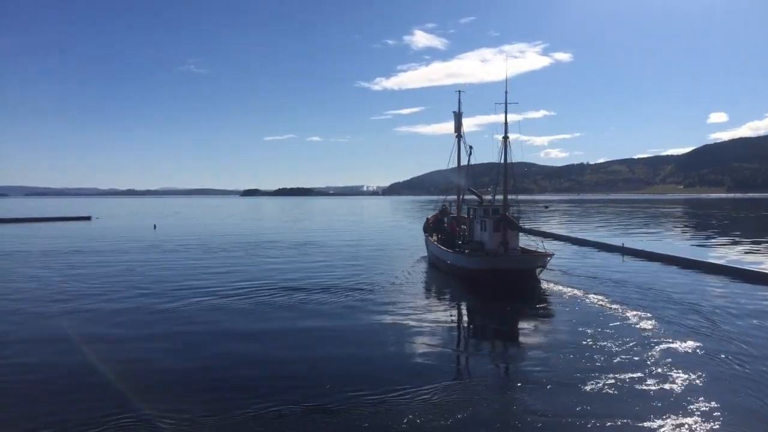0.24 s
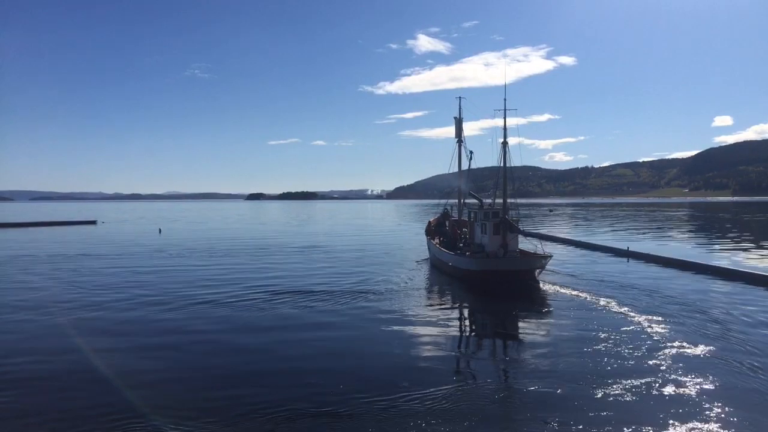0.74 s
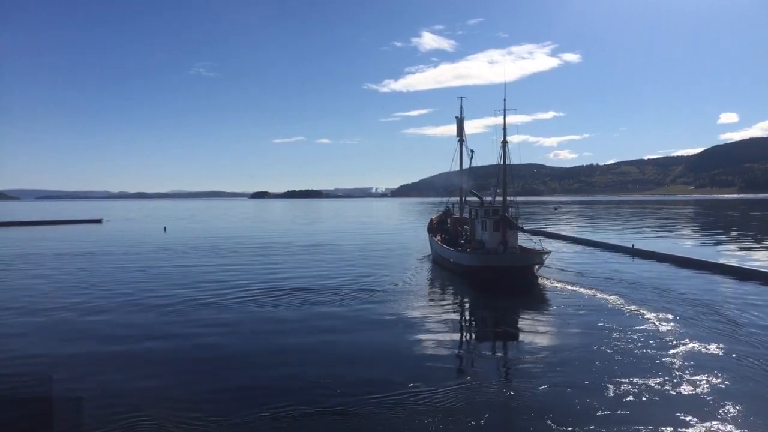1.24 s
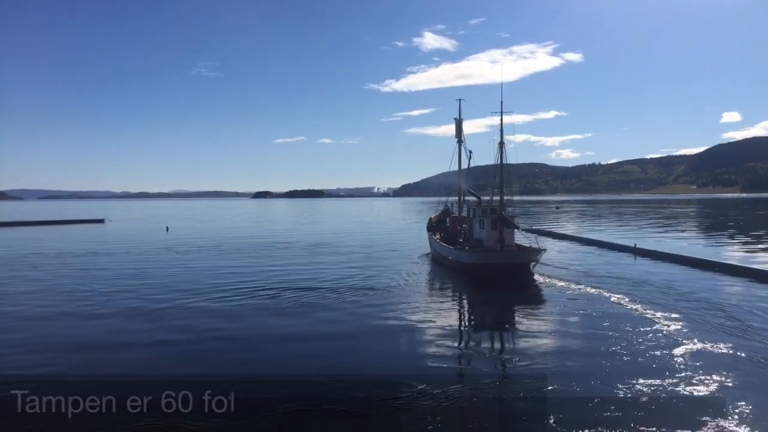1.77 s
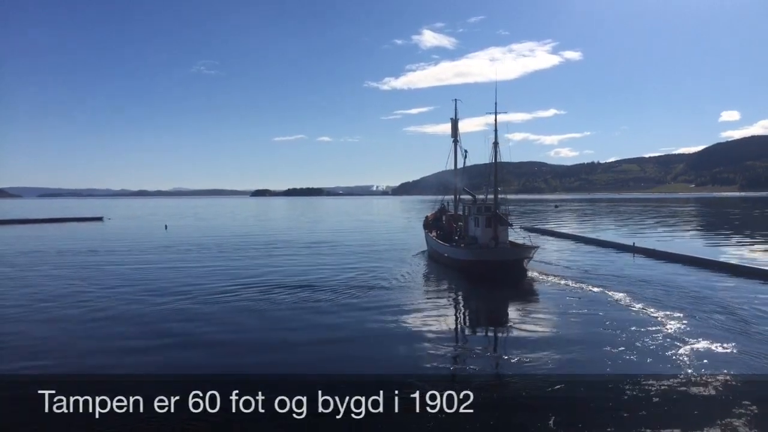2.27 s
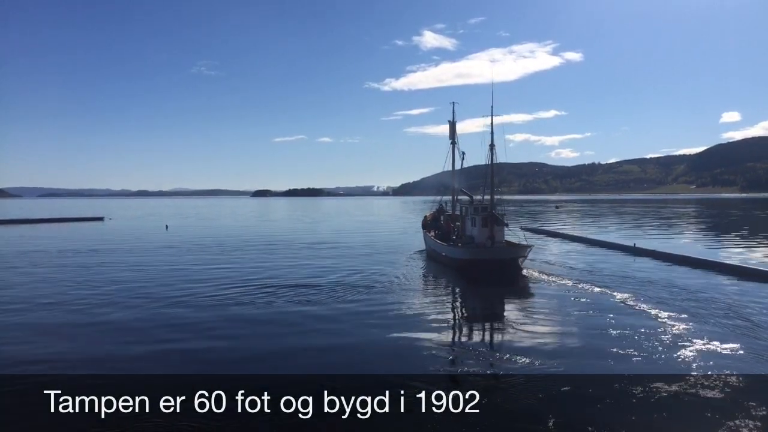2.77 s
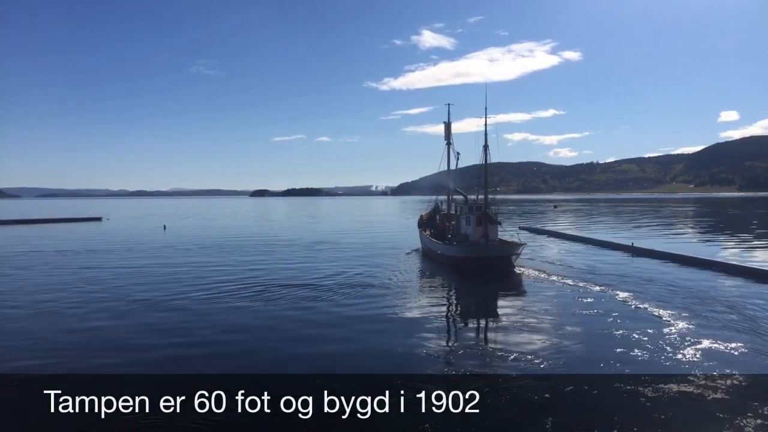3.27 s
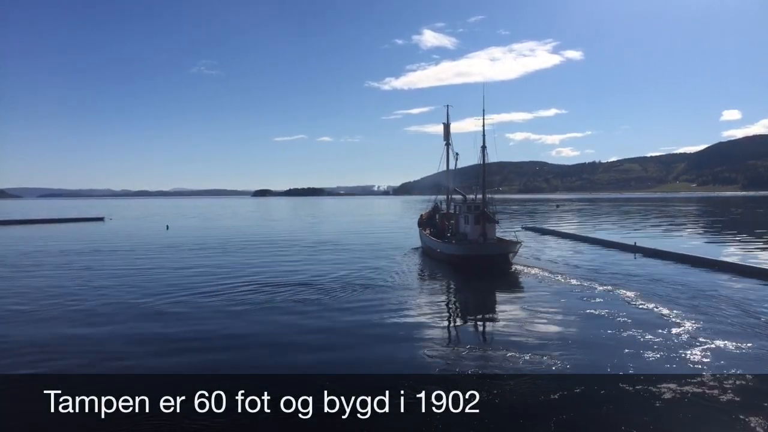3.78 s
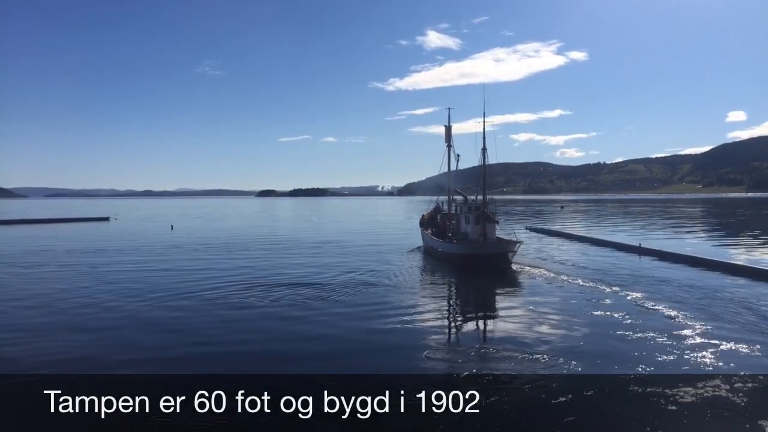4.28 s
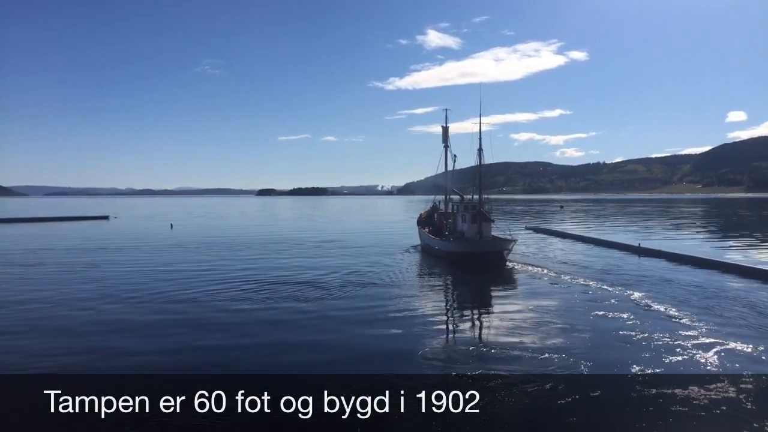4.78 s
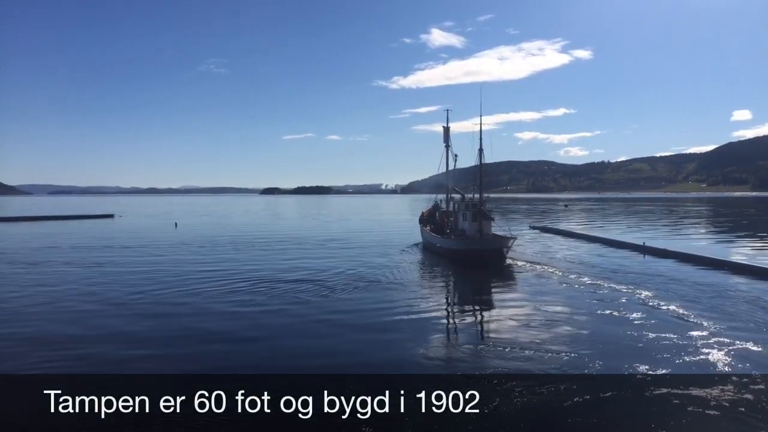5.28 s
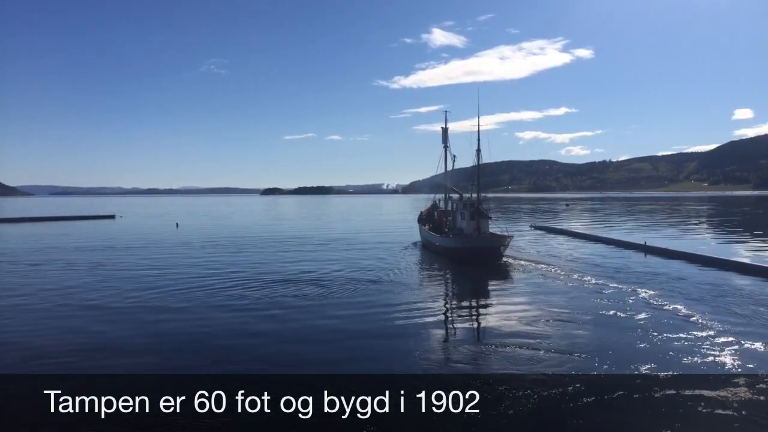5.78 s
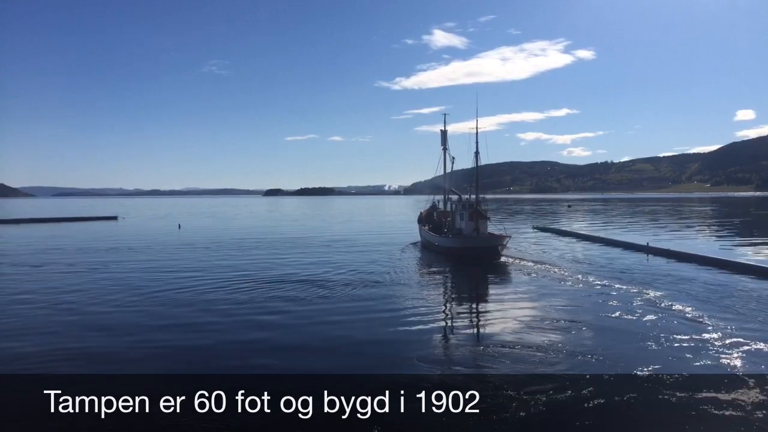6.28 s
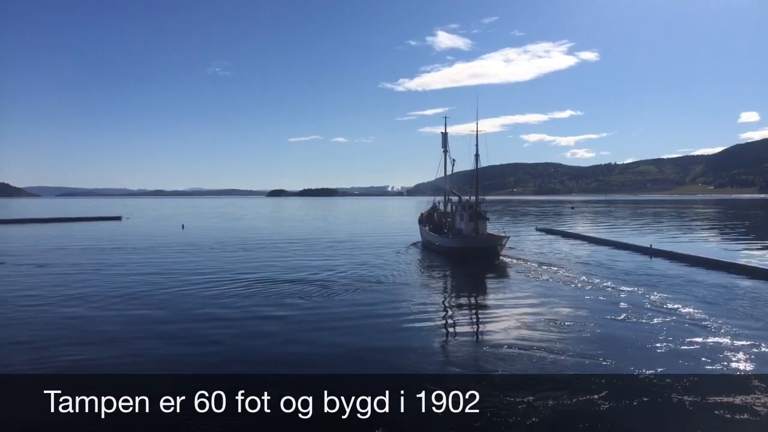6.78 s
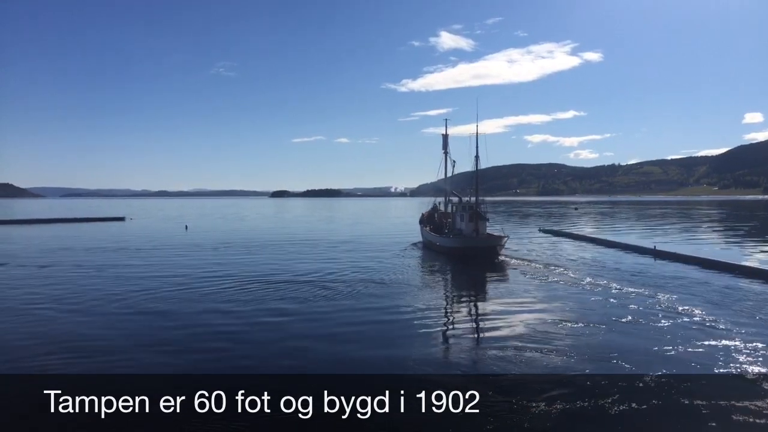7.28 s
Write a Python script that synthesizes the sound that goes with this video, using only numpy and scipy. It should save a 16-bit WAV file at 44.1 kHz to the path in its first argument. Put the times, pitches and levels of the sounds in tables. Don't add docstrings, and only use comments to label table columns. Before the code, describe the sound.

A slow two-cylinder oil engine knocks hollow tonk-tonk about six times a second as a wooden boat draws away over softly hissing water.

```python
import sys
import numpy as np
from scipy import signal
from scipy.io import wavfile
from scipy.ndimage import uniform_filter1d

SR = 44100
rng = np.random.default_rng(int(sys.argv[2]) if len(sys.argv) > 2 else 0)


def dump(signal):
    limited = np.clip(np.atleast_2d(signal).T, -1, 1)
    pcm = np.round(limited * 32767).astype(np.int16)
    wavfile.write(sys.argv[1], SR, pcm)


def boost_factor(decibels):
    exponent = np.asarray(decibels, float) / 20
    return 10 ** exponent


N = 332073
T = np.arange(N) / SR

# time in seconds, firings counted so far.
CRANK = [(-0.3176, -3), (0.159, 0), (0.7933, 4), (1.426, 8), (2.0572, 12), (2.6867, 16), (3.3147, 20),
         (3.941, 24), (4.5657, 28), (5.189, 32), (5.811, 36), (6.4317, 40), (7.0515, 44), (7.6703, 48)]
# time in seconds, level in dB.
CHURN = [(0, -49), (0.9, -51.5), (1.65, -52.5), (2.01, -57.5), (2.3, -56), (2.81, -52), (3.0, -53.5),
         (3.33, -52), (4.09, -51.5), (4.78, -53), (5.14, -56.5), (5.75, -55.5), (6.19, -52), (7.0, -57.5),
         (7.53, -54)]
# time in seconds, low throat in Hz, middle throat in Hz.
THROATS = [(0, 615, 1360), (1.6, 655, 1300), (3.4, 661, 1395), (4.8, 745, 1532), (5.2, 743, 1300),
           (7.53, 778, 1272)]


def rms_one(x):
    return x / np.sqrt(np.mean(x ** 2) + 1e-20)


def in_time(rows):
    s, *columns = np.transpose(rows)
    return [np.interp(T, s, c) for c in columns]


def at(rows, s, column):
    return np.interp(s, [row[0] for row in rows], [row[column] for row in rows])


def drift(rate, size=N):
    r = np.exp(-80 * np.pi * rate / SR)
    white = rng.standard_normal(size // 40 + 2002)
    slow = signal.lfilter([1], [1, -2 * r, r * r], white)[2000:]
    return np.interp(np.arange(size) / 40, np.arange(len(slow)), slow / slow.std())


def resonate(x, hz, width_hz):
    r = np.exp(-np.pi * width_hz / SR)
    feedback = [1, -2 * r * np.cos(2 * np.pi * hz / SR), r * r]
    return signal.lfilter([(1 - r * r) / 2, 0, (r * r - 1) / 2], feedback, x)


def band(x, low_hz, high_hz, order=2):
    return signal.sosfilt(signal.butter(order, [low_hz, high_hz], "band", fs=SR, output="sos"), x)


def throat(gas, hz, width_hz):
    tone = rms_one(resonate(resonate(gas, hz, width_hz), hz, width_hz))
    recent_power = uniform_filter1d(tone ** 2, size=round(SR / width_hz))
    return rms_one(tone / np.sqrt(.15 + recent_power))


def swell(t, rise, t60, tail_db, tail_t60):
    fall = boost_factor(-60 * t / t60) + boost_factor(tail_db - 60 * t / tail_t60)
    return (1 - np.exp(-(t / rise) ** 2)) * fall


def add(out, x, s):
    i = round(s * SR)
    x = x[max(-i, 0):N - i]
    out[max(i, 0):max(i, 0) + len(x)] += x


def taps(rows, cycles, width):
    out, t = np.zeros(N), T[:int(.03 * SR)]
    for s, peak_db, hz in rows:
        noise = band(rng.standard_normal(len(t)), 0.8 * hz, 1.22 * hz)
        burst = rms_one(resonate(noise, hz, width * hz)) * swell(t, 0.002, cycles / hz, -31, .03)
        add(out, boost_factor(peak_db + 4) * burst, s)
    return out


def roll(s):
    return np.cos(2 * np.pi * (s - .3) / 2.16)


def firings():
    # start in seconds, tonk level in dB,
    # middle throat level in dB, upper throat level in dB, upper throat pitch in Hz.
    fore = [(0.112, -13.5, -12, -25, 1575), (0.433, -16, -8.5, -22, 1490), (0.748, -15, -19, -24, 1700),
            (1.064, -12.5, -13.5, -26, 1606), (1.382, -13, -19, -21.5, 1510),
            (1.6984, -18.5, -15, -21.5, 1670), (2.013, -12, -19, -23.5, 1680),
            (2.329, -16.5, -24, -22, 1710), (2.6449, -15.5, -22, -22.5, 1800),
            (2.96, -15, -15.5, -23, 1950), (3.269, -12, -15, -24, 1720), (3.581, -18.5, -20, -27, 1850),
            (3.897, -18, -12.5, -24, 1620), (4.2092, -15, -14.5, -24, 1947), (4.519, -18.5, -12, -23, 1926),
            (4.8324, -15, -14.5, -21.5, 1490), (5.143, -17.5, -10, -25, 1960),
            (5.4576, -19, -22, -21, 1550), (5.77, -19, -31, -19, 1440), (6.0783, -25.5, -20, -23.5, 1890),
            (6.39, -19, -19, -20, 1570), (6.697, -18, -12.5, -30, 1686), (7.0059, -13, -18, -20, 1665),
            (7.3166, -13.5, -37, -19.5, 1702)]
    aft = [(0.2746, -16, -5, -30, 1510), (0.5887, -11, -13.5, -29, 1490), (0.9065, -16.5, -18.5, -26, 1940),
           (1.223, -13.5, -6.5, -28.5, 1570), (1.5377, -12.5, -11, -25, 1570),
           (1.855, -12.5, -16, -23.5, 1540), (2.1671, -16.5, -25, -23.5, 1760),
           (2.485, -9.5, -19.5, -21.5, 1680), (2.8, -13.5, -14, -27, 1660),
           (3.1114, -16, -14.5, -26.5, 1680), (3.427, -18.5, -12, -28.5, 1468), (3.74, -14, -13, -26, 1460),
           (4.053, -13.5, -14.5, -27.5, 1500), (4.3633, -13.5, -18, -26.5, 1950),
           (4.6741, -14, -19, -25.5, 1400), (4.9871, -12.5, -14, -28, 1510), (5.3, -14, -14, -21.5, 1940),
           (5.611, -18, -21.5, -24, 1960), (5.9246, -11.5, -24, -22.5, 1530),
           (6.233, -13, -21, -23.5, 1563), (6.544, -22, -20, -29, 1690), (6.853, -18, -17.5, -28.5, 1740),
           (7.1586, -19.5, -39, -28, 1740), (7.471, -16, -18, -32, 1730)]
    earlier = (-0.76, 11, -53, -26, 1504)
    return [earlier] + [row for pair in zip(fore, aft) for row in pair]


def rumble():
    return boost_factor(-72) * rms_one(band(rng.standard_normal(N), 18, 38))


def drone():
    # multiple of the firing rate, level near in dB, level far away in dB.
    overtones = [(7, -54, -55), (8, -66, -66), (10, -63, -65), (11, -58, -58), (12, -40, -47),
                 (13, -60, -62), (14, -60, -60), (16, -58, -57), (17, -60, -53), (18, -39.5, -36.5),
                 (19, -55, -51), (20, -52, -52), (23, -59, -53), (24, -48, -41.5), (25, -54, -52),
                 (29, -48, -58), (30, -43, -54), (31, -53, -60), (35, -51, -55), (36, -43, -54),
                 (37, -49, -59)]
    turns = in_time(CRANK)[0]
    away = T / T[-1]
    out = 0
    for multiple, near_db, far_db in overtones:
        level_db = near_db + (far_db - near_db) * away + .04 * multiple * drift(2.5)
        lag = .0005 * multiple ** 2 * drift(2.2)
        out = out + np.sqrt(2) * boost_factor(level_db) * np.cos(2 * np.pi * multiple * turns + lag)
    return out


def wash():
    # pitch in Hz, level in dB per Hz.
    colour = [(140, 0), (313, -1.5), (390, -9), (690, -3), (924, -12.5), (1280, -8.5), (2010, -14),
              (2320, -28)]
    swelling = in_time(CHURN)[0]
    white = rng.standard_normal((2, N))
    hz, db = np.transpose(colour)
    out, edges = 0, 128 * 2 ** np.arange(0, 4.9, 1 / 4)
    for k, (low, high) in enumerate(zip(edges, edges[1:])):
        middle = np.log(low * high) / 2
        gain_db = np.interp(middle, np.log(hz), db) + 2.3 * drift(17.0)
        out = out + boost_factor(gain_db) * band(white[k % 2], low, high)
    return boost_factor(-34 + .5 * (swelling - swelling.mean())) * rms_one(out)


def bubbly(per_s, grain_db):
    size = boost_factor(4.3 * np.minimum(rng.exponential(1, N), 5))
    grains = size * rng.choice([-1, 1], N) * (rng.random(N) < per_s / SR)
    return rng.standard_normal(N) + boost_factor(grain_db) * rms_one(grains)


def spray():
    # pitch in Hz, width in Hz, level in dB at mean churn,
    # share of the churn's swing (a plain factor).
    bright = [(4450, 1510, -53.5, 1.06), (7750, 2500, -60, 0.99), (11700, 6000, -67, 0.88)]
    out = boost_factor(-65) * rms_one(band(rng.standard_normal(N), 2400, 15000, order=1))
    together = drift(32)
    swing_db = in_time(CHURN)[0] + 54
    for hz, width, db, share in bright:
        flicker_db = .8 * together + 1.4 * drift(45)
        water = band(bubbly(900, -3.7), hz - 0.64 * width, hz + 0.34 * width)
        out += boost_factor(db + share * swing_db + flicker_db) * rms_one(resonate(water, hz, width))
    return out


def splashes():
    # start in seconds, length in seconds, pitch in Hz, level in dB.
    wavelets = [
        (4.1, 0.08, 7700, -55),
        (5.596, 0.14, 7800, -56),
        (5.64, 0.114, 11400, -81),
        (0, 0.068, 295.4, -26.5),
        (.6, 0.28, 238, -35),
        (2.0, 0.19, 190, -36.5),
        (2.24, 0.098, 176.5, -29.5),
        (2.42, 0.066, 172, -35),
        (6.75, 0.1, 199.2, -37),
    ]
    out, longest = np.zeros(N), int(.3 * SR)
    for s, length, hz, db in wavelets:
        spread = .09 if hz > 1000 else .01
        t = T[:int(length * SR)]
        fizz = rng.standard_normal(longest)[:len(t)] * boost_factor(5 * drift(120, size=longest))[:len(t)]
        fizz = rms_one(band(fizz, (1 - spread) * hz, (1 + spread) * hz))
        add(out, boost_factor(db) * fizz * np.sin(np.pi * t / length), s)
    return out


def drips():
    when, size, pitch = rng.random((60, 3)).T
    s = when ** 1.5 * T[-1]
    peak_db = -42 - 1.2 * s + 3 * (2 * size - 1)
    return taps(zip(s, peak_db, 6000 * 2 ** pitch), 40.0, 0.3)


def thumps():
    fade_db_per_s = .5
    rim_hz, rim_width_hz, rim_db = 2950, 150, -3.5
    out, t = np.zeros(N), T[:int(.1 * SR)]
    for k, (s, *_) in enumerate(firings()):
        gas = rng.standard_normal((3, len(t)))
        blow = rms_one(band(gas[0], 220, 463)) + boost_factor(-9.5) * rms_one(band(gas[1], 810, 1320))
        blow += boost_factor(-11 + 2.5 * s) * throat(gas[1], 539, 65)
        add(out, boost_factor(-26.5 - fade_db_per_s * s) * blow * swell(t, 0.0035, 0.07, -40, .1), s - .004)
        edge = rms_one(band(gas[2] ** 3, 1900, 3400))
        edge += boost_factor(rim_db) * rms_one(resonate(gas[2], rim_hz, rim_width_hz))
        crack_db = -33.5 - 12.0 * (1 - k % 2) - fade_db_per_s * s
        add(out, boost_factor(crack_db) * edge * swell(t, .002, 0.028, -40, .1), s + 0.0049)
    return out


def tonks():
    aft_lift_hz, lift_hz_per_db = 25, 3.5
    upper_near_db, upper_far_db, swing_s = -45, -31, 3
    tonk, gusts, t = np.zeros(N), np.zeros((3, N)), T[:int(.3 * SR)]
    for k, (s, peak_db, *_) in enumerate(firings()):
        stronger_db = peak_db + 15
        hz = at(THROATS, s, column=1) + aft_lift_hz * (1 - k % 2) + lift_hz_per_db * stronger_db
        boom_db = -26.5 - 0.87 * s + 0.2 * stronger_db + 2.5 * roll(s)
        upper_db = upper_near_db + (upper_far_db - upper_near_db) * min(s / swing_s, 1)
        gas = rng.standard_normal((3, len(t))) * boost_factor(1.8 * drift(46.0, size=len(t)))
        main = band(throat(gas[0], hz, 107.0), 543, 867)
        leak = band(throat(gas[1], 645, 119.0), 548, 840)
        lumps = boost_factor(3.7 * np.cos(2 * np.pi * (t - .009) / 0.0238))
        add(tonk, boost_factor(peak_db - 6.5) * main * lumps * swell(t, 0.0056, 0.077, -7, 0.21), s - .005)
        leak_db = peak_db - 13.5 + 5.3 * (2.5 - s / 3.5)
        add(tonk, boost_factor(leak_db) * leak * swell(t, 0.038, 0.28, -27, .3), s - .032)
        even = throat(rng.standard_normal(len(t)), 289.0, 107)
        add(gusts[0], boost_factor(boom_db) * even * swell(t, 0.0241, 0.17, -13.5, 1.0), s - .006)
        add(gusts[1], boost_factor(upper_db) * gas[2] * swell(t, 0.005, 0.12, -15.0, 0.83), s - .008)
        add(gusts[2], boost_factor(0.11 * peak_db) * gas[2] * swell(t, 0.029, 0.21, -29.5, 1.0), s - .009)
    return tonk, gusts


def puffs():
    aft_db, fore_db, fade_db_per_s = -34, -31, 0.23
    knock, t = np.zeros(N), T[:int(.25 * SR)]
    for k, (s, _, middle_db, upper_db, upper_hz) in enumerate(firings()):
        middle_hz = at(THROATS, s, column=2)
        hiss_db = (aft_db, fore_db)[k % 2] - fade_db_per_s * s - 0.58 * roll(s)
        gas = rng.standard_normal((4, len(t))) * boost_factor(2 * drift(170, size=len(t)))
        middle = throat(gas[0], middle_hz, 85.0)
        upper = throat(gas[1], upper_hz, 207)
        broad = rms_one(band(gas[2], 893, 2180, order=3))
        throats = boost_factor(middle_db - 6.5) * middle + boost_factor(upper_db + 6.0) * upper
        throats += boost_factor((middle_db + upper_db) / 2 + 2.5) * broad
        throats = band(throats, 540, 2100, order=3)
        hiss = resonate(gas[3], 3930, 980) + boost_factor(-3) * band(gas[3], 2160, 3690)
        faint_top = rms_one(band(gas[3], 6550, 8600, order=3))
        hiss = rms_one(band(hiss, 1790, 5110, order=4)) + boost_factor(-23) * faint_top
        hiss *= boost_factor(2.5 * drift(110, size=len(t)))
        puff = throats * swell(t, 0.011, 0.097, -11, 0.1)
        puff += boost_factor(hiss_db + 5.5) * hiss * swell(t, .011, 0.078, -24.5, 0.15)
        add(knock, puff, s - .005)
    return knock


def ring(gust, modes, widen):
    out = 0
    for k, (hz, width, db) in enumerate(modes):
        once = resonate(gust, hz, widen * width)
        out = out + (-1) ** k * boost_factor(db) * resonate(once, hz, widen * width)
    return out


def stack(gusts):
    # pitch in Hz, width in Hz, level in dB.
    silencer = [(190, 36, -8), (241.1, 13.5, -3), (260.5, 34, -12), (289.2, 19.6, 1.5), (333.6, 27, -1.5),
                (418, 35, -8.5), (471, 17.3, 0)]
    # pitch in Hz, width in Hz, level in dB.
    pipe = [(560, 32, 0.5), (616, 66, -5), (660, 4.7, 5.5), (724, 64, -2.5), (760, 18, -23.5),
            (815, 32, -25), (1077.3, 114, -2.5), (1300, 31, 1), (1510, 66, -5.5), (1740, 41, -5.5),
            (1960, 36, -4.5)]
    low = ring(gusts[0], silencer[:5], 1.57)
    upper = ring(gusts[1], silencer[5:], 2.3)
    top = 0
    for k, (hz, width, db) in enumerate(pipe):
        top = top + (-1) ** k * boost_factor(db + 0.76 * drift(0.83)) * resonate(gusts[2], hz, width)
    trips = np.cos(2 * np.pi * 6 * in_time(CRANK)[0])
    low = rms_one(low) * boost_factor(2.2 * trips)
    top = rms_one(band(top * boost_factor(1.04 * trips), 540, 3160, order=3))
    return boost_factor(-35) * rms_one(low) + boost_factor(-42) * rms_one(upper) + boost_factor(-34.5 - 4 * T / T[-1]) * top


def quay(x):
    # delay in seconds, level in dB.
    echoes = [
        (.022, -14),
        (.041, -12),
        (.066, -26.5),
        (.093, -22.5),
    ]
    out = np.zeros(N)
    for delay, db in echoes:
        add(out, boost_factor(db) * x, delay)
    return band(out, 450, 1440)


def drops():
    # start in seconds, peak level in dB, pitch in Hz.
    clear = [(0.195, -36, 7200), (0.3895, -40, 6300), (0.632, -28, 8150), (0.8619, -35, 7700),
             (1.1538, -39, 6880), (1.281, -35, 7900), (1.3643, -31.5, 6900), (1.5569, -35, 7000),
             (1.6546, -36.5, 7930), (1.8746, -38, 7260), (2.1889, -36, 7300), (2.7761, -37, 7390),
             (2.9467, -37.5, 7950), (2.9677, -35.5, 7750), (3.2291, -36.5, 7840), (4.1365, -34.5, 7750),
             (4.2453, -31.5, 7960), (4.2896, -36.5, 7340), (4.2258, -38, 8000), (5.7428, -40, 7300),
             (5.9259, -36.5, 8260)]
    return taps(clear, 84.0, 0.14)


def pump():
    # start in seconds, peak level in dB, pitch in Hz.
    knocks = [
        (0.8629, -36, 4620),
        (0.9981, -39, 4550),
        (2.5394, -46, 4450),
        (3.574, -34, 4700),
        (3.852, -40, 2950),
        (5.5377, -36, 4170),
        (5.6907, -54, 4150),
        (5.8507, -43, 4300),
        (5.892, -44, 4200),
    ]
    return taps(knocks, 104, 0.047)


def scene():
    tonk, gusts = tonks()
    knock = tonk + puffs()
    engine = drone() + thumps() + knock + stack(gusts) + quay(knock) + pump()
    water = wash() + spray() + splashes() + drips() + drops()
    return (rumble() + engine + water)[None]


def roll_off(x):
    return signal.sosfilt(signal.butter(12, 15770, fs=SR, output="sos"), x)


def record(dry):
    thin = signal.sosfilt(signal.butter(2, 35, "high", fs=SR, output="sos"), dry)
    thin = signal.sosfilt(signal.cheby2(18, 45, 15900, fs=SR, output="sos"), thin)
    return roll_off(thin)


dry = scene()
out = record(dry)
dump(out)
```